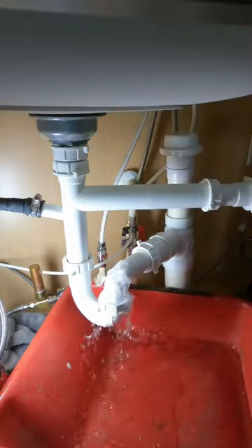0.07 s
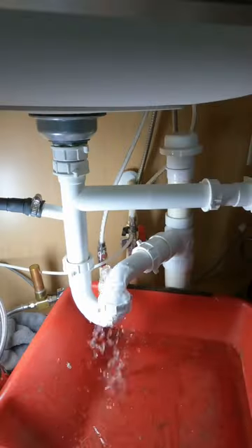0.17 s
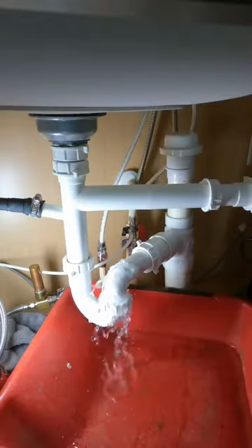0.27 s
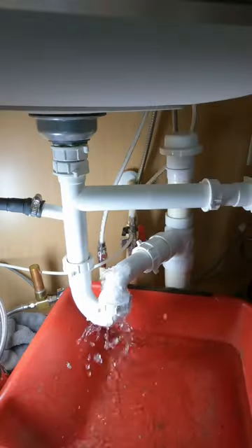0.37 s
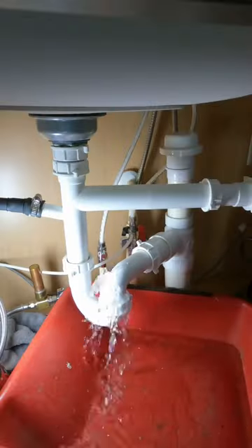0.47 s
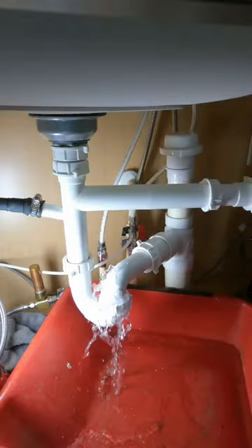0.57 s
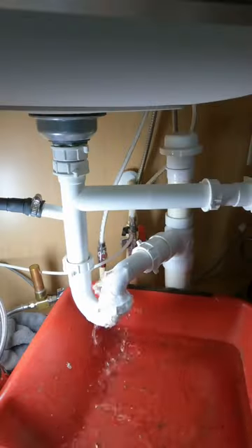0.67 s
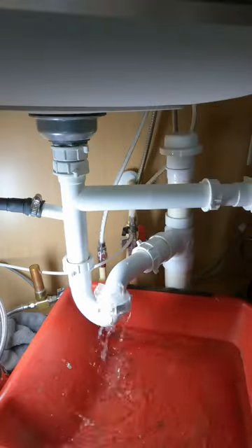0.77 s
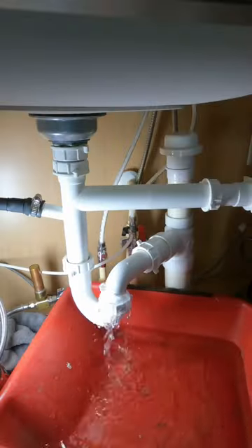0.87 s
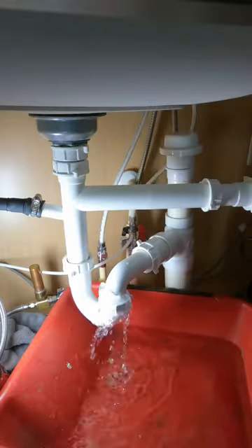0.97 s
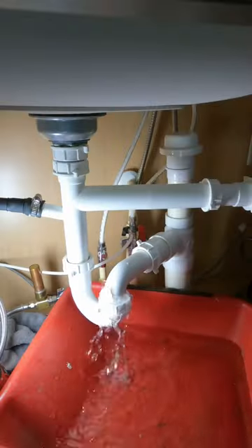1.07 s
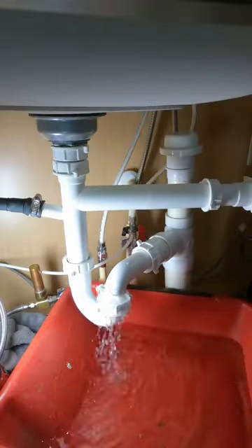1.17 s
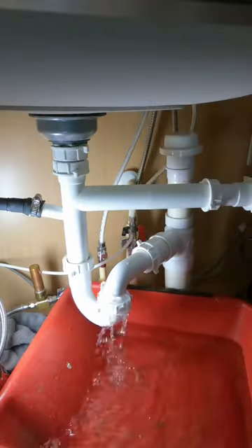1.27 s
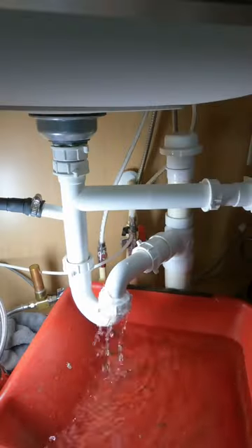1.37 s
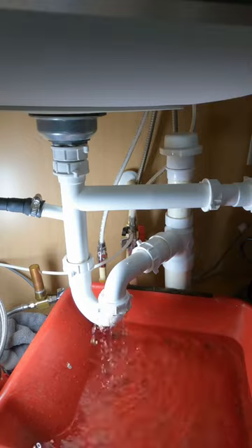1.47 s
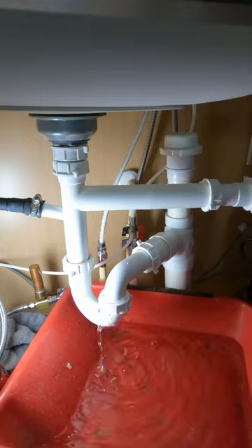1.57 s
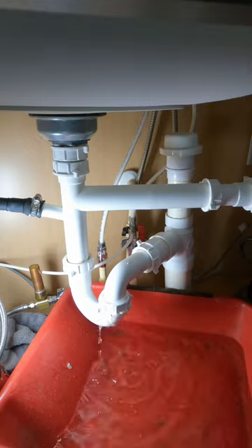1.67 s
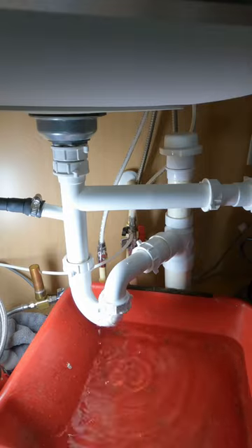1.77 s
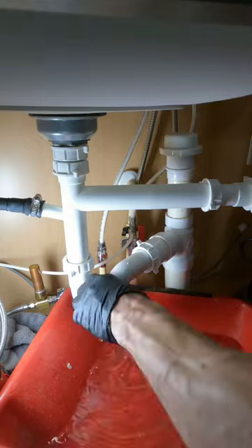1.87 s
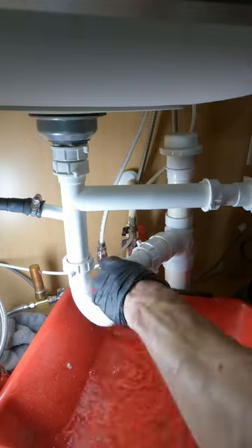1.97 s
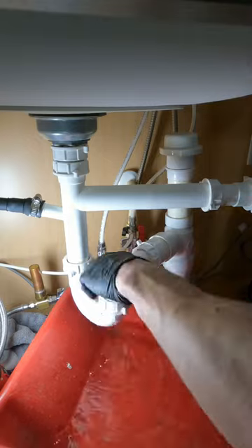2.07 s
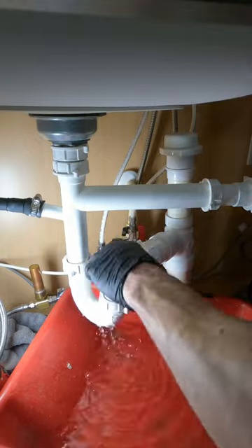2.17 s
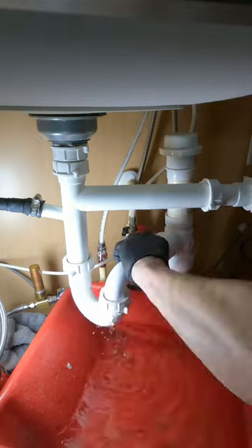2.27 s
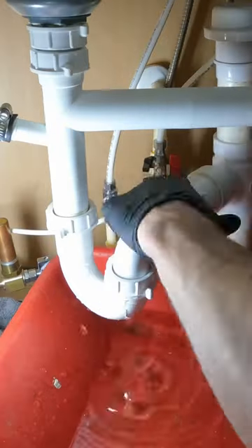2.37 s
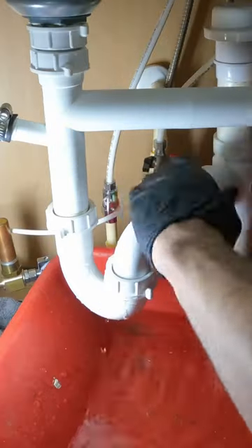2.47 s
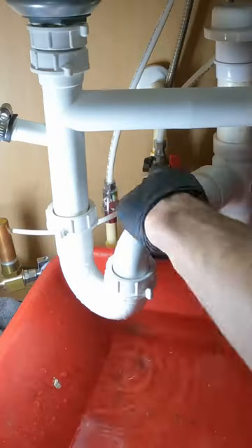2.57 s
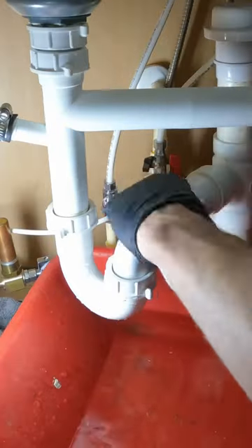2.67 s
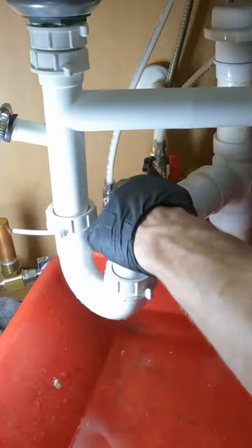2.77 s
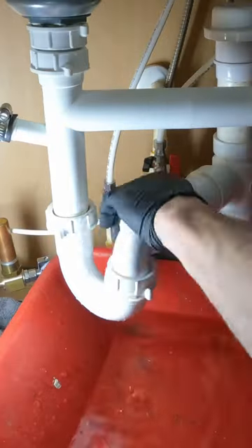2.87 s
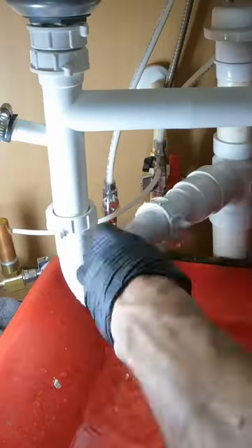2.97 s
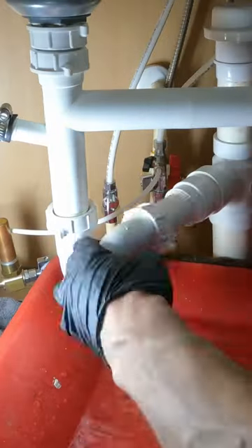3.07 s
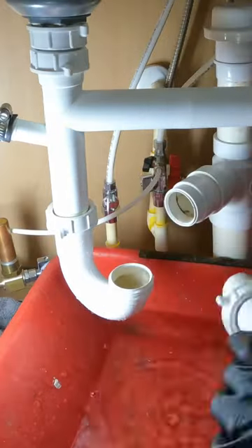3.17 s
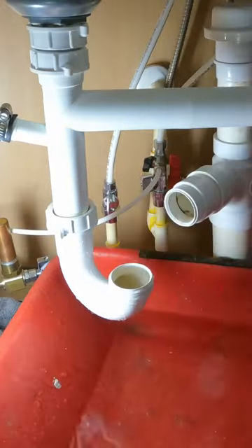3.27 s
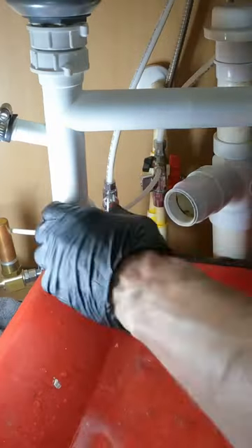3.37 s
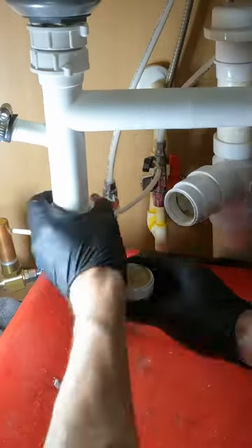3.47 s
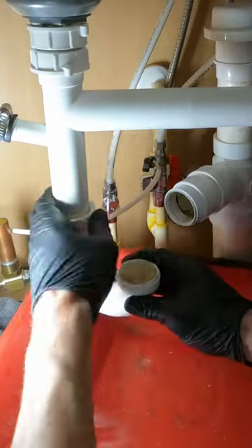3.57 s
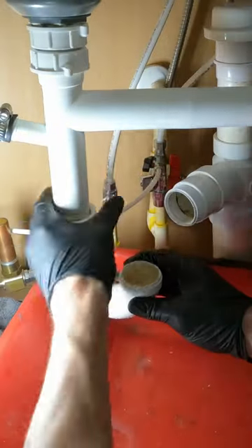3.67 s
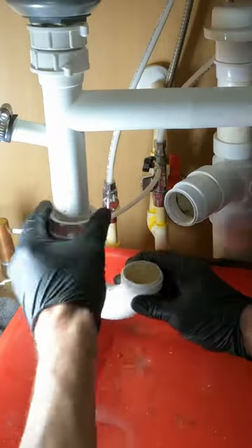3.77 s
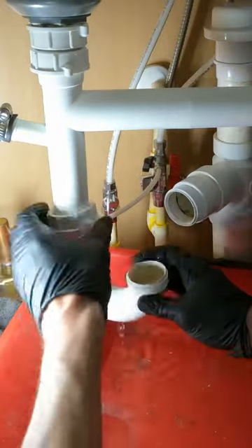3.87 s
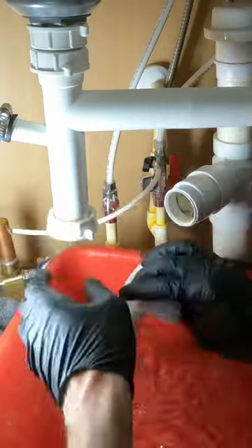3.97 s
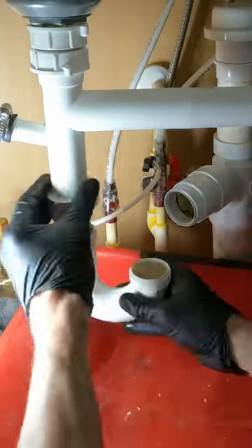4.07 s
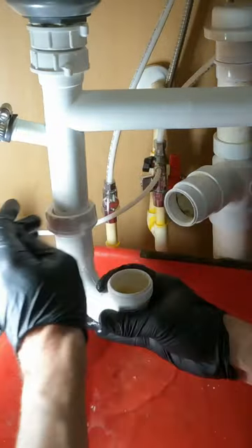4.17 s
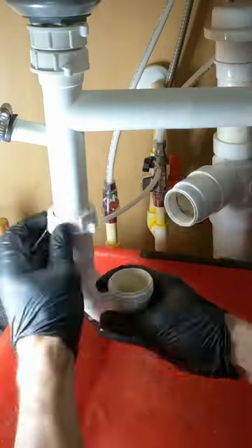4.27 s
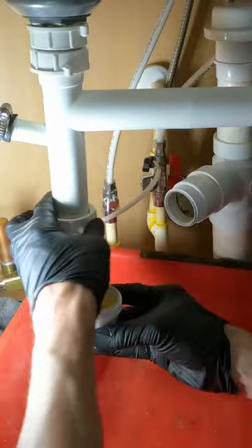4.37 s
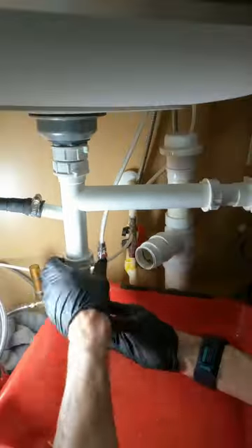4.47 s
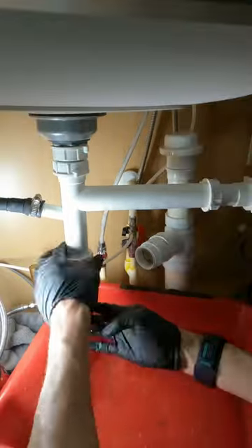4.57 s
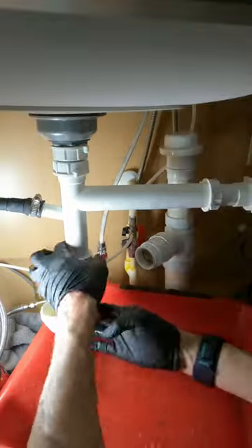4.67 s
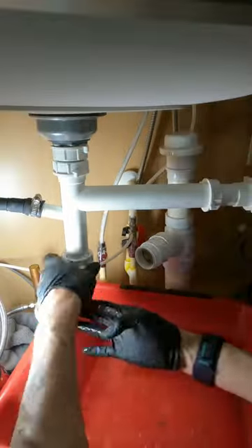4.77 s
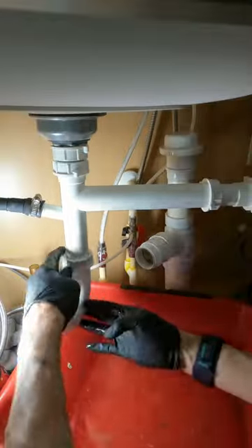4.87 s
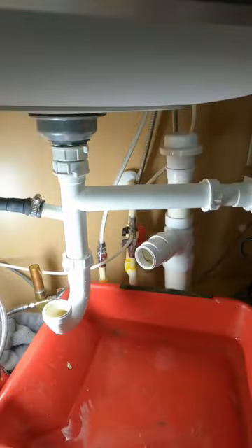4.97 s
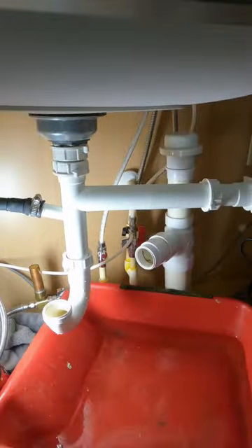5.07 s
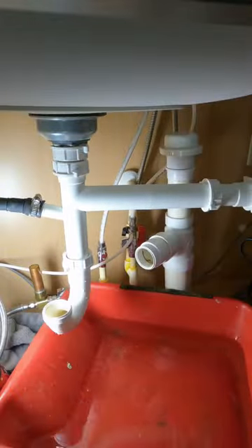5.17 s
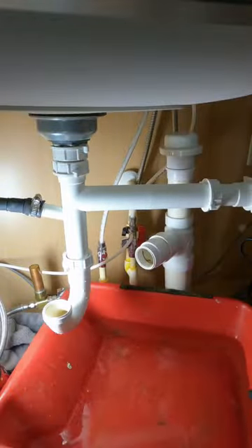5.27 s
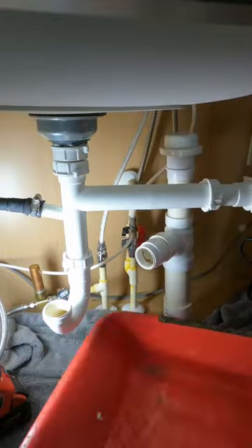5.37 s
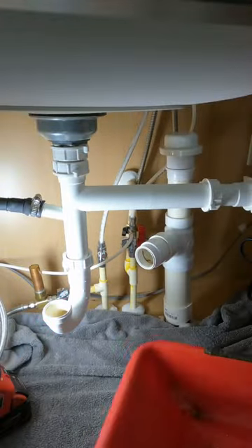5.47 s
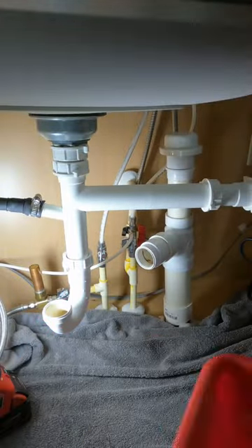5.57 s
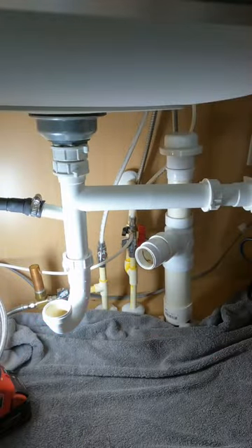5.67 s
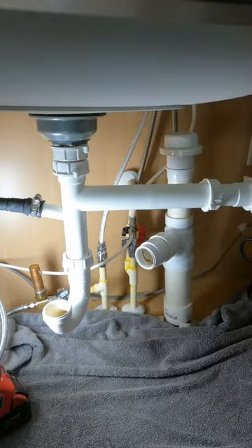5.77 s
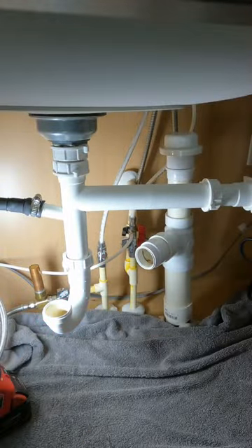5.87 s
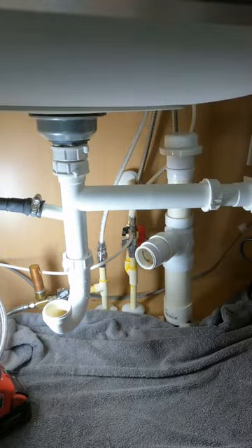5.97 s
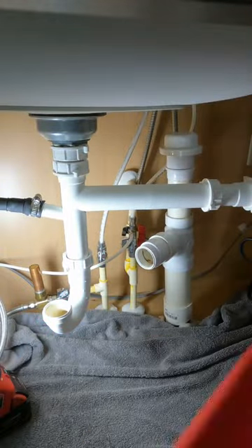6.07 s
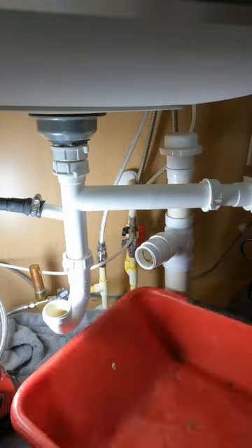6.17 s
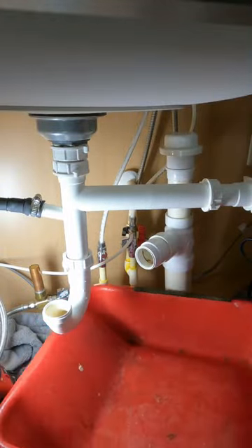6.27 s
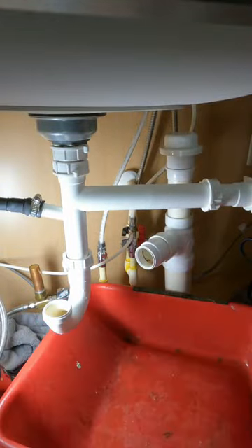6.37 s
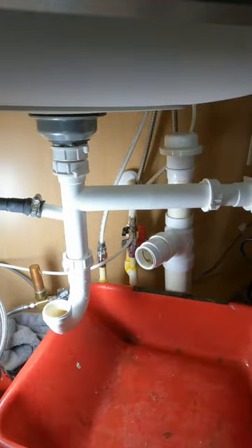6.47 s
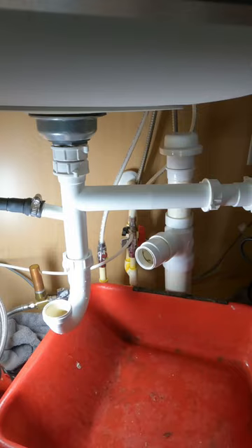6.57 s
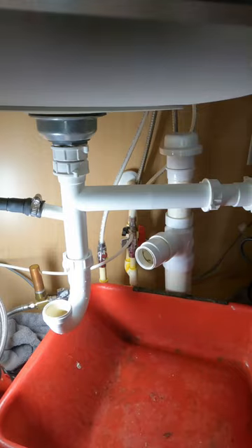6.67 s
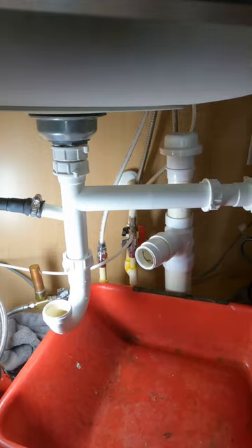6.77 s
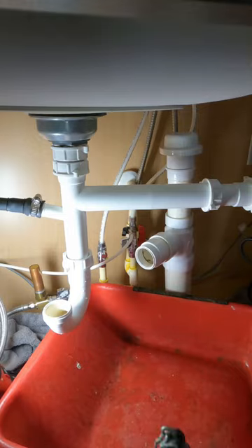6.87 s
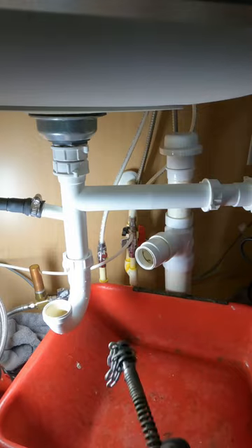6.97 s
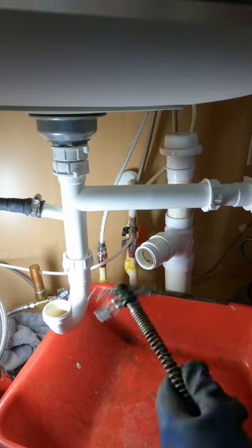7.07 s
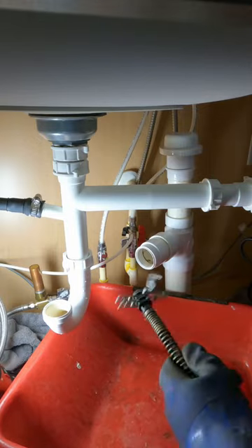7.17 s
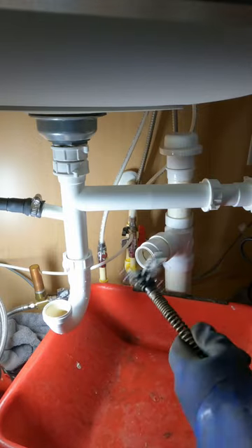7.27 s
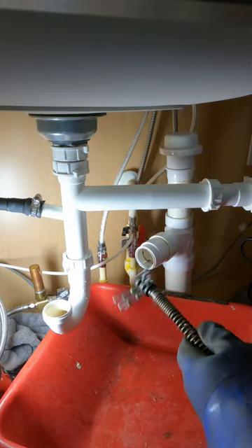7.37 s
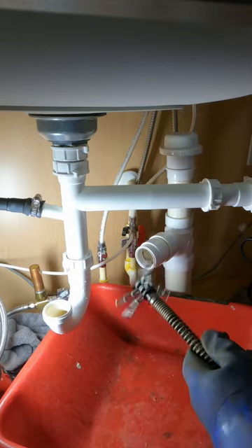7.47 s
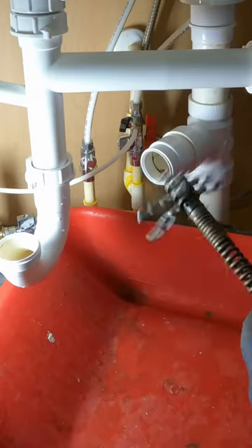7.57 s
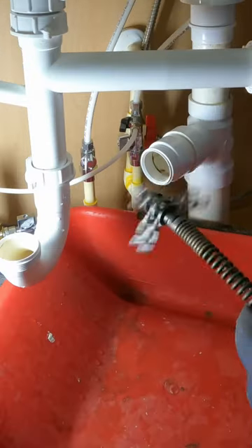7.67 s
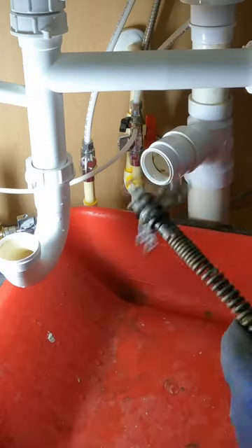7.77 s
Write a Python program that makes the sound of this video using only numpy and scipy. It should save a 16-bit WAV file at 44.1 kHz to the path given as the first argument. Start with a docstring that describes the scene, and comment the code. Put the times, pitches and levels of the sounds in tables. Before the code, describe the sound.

Close under a kitchen sink, water gushes and slaps into a plastic tub, thins to a fluttering hissing spray and spits out. Gloved hands twist plastic nuts in clicks and gritty scrapes, with one loud hollow pop as the pipe comes free. The tub is knocked and dragged about, cloth swishes softly, then an electric drain machine starts suddenly with a chattering steel head and a steady gear whine.

```python
"""Under a kitchen sink: water gushes from a loosened plastic trap into a tub, thins to a spray and sputters out.
The water is grain noise, ringing slugs, bubbles and trap resonances; the spray slides a comb over its hiss.
Gloved hands unscrew the nuts in clicks and scrapes, pull the pipe off and shift the tub: grit rings plastic modes.
Then an electric drain machine starts: a gear whine from sine lines, and a steel cable rattling in grain noise
as its head swings round. Quiet room noise lies under it all."""
import sys
import numpy as np
from scipy import signal
from scipy.fft import rfft, irfft
from scipy.io import wavfile
from scipy.ndimage import uniform_filter1d

SR = 44100
rng = np.random.default_rng(int(sys.argv[2]) if len(sys.argv) > 2 else 0)


def store_pcm(level_fs):
    """Save levels as 16-bit WAV."""
    pcm = np.round(np.clip(level_fs, -1, 1) * 32767).astype(np.int16)
    wavfile.write(sys.argv[1], SR, np.atleast_2d(pcm).T)


N = 344421
T_S = np.arange(N) / SR
HIT_S = T_S[:SR // 6]  # time axis of one hit

# gush spectrum: freq_hz, gain_db
GUSH_COLOUR = [(59, -58), (100, -39), (156, -39), (302, -8.5), (380, -16), (558, -1.5), (721, -21.5),
               (880, -18.5), (1060, -7.5), (1190, -15.5), (1650, -12), (1900, -15), (2170, -8.5),
               (2450, -29), (3780, -19), (4800, -23), (5500, -30), (7200, -33), (16000, -28.5)]
# slugs of water slapping the tub floor: start_s, ring_hz (10 ms in), level_db
SLAPS = [(.024, 571, -37.5), (.08, 547, -36), (.14, 557, -31.5), (.185, 550, -29.5), (0.204, 462, -44),
         (.25, 571, -31.5), (.3, 535, -35), (.335, 591, -31.5), (.372, 557, -29.5), (0.419, 443, -39.5),
         (0.456, 547, -30.5), (.493, 610, -38), (0.519, 579, -30), (.578, 548, -39), (.615, 536, -27.5)]
SLAP_GLIDE_PER_S = 3.6  # trapped air rises by this share of ring_hz a second
GUSH_END_S, GUSH_DB = .668, -48  # level between slugs, before lulls
# falters of the gush: centre_s, gain_db
LULLS = [(.066, -3), (.232, -5), (.567, -8.5)]
LULL_HALF_S = .012
GURGLE_HZ, GURGLE_WANDER, GURGLE_DB = 2147, .03, -9.5  # water-filled bend; wander as share, level against patter
# drops bursting in the tub and on wet plastic: start_s, bubble_hz, level_db
SPLASHES = [(.009, 4970, -43.5), (0.03, 12500, -46), (0.049, 11300, -42), (.08, 10100, -50.5),
            (.106, 13400, -50), (.19, 8790, -50), (0.208, 4260, -47), (.271, 9000, -48.5),
            (0.334, 4850, -48), (.341, 7500, -51), (0.353, 14300, -47), (0.377, 5900, -49.5),
            (.42, 14700, -46), (.523, 3970, -51), (.538, 11500, -48), (2.16, 9800, -41.5),
            (2.215, 8550, -48), (2.23, 14300, -53), (2.273, 7600, -50.5), (2.285, 14300, -45),
            (3.159, 9300, -54), (3.197, 9700, -50), (3.229, 9400, -52.5), (3.246, 9400, -54.5),
            (3.258, 12400, -58), (3.296, 9600, -57), (3.323, 8900, -43), (3.338, 9200, -52),
            (3.967, 8000, -46), (4.332, 7800, -52), (4.405, 7900, -51), (5.21, 6500, -55),
            (5.221, 6500, -56)]
CRACKLE_START_DB, CRACKLE_SAG_DB_PER_S = -57, 24  # fine droplets

# spray spectrum: freq_hz, gain_db
SPRAY_COLOUR = [(200, -35), (360, -11.5), (700, -32), (1000, -11), (1450, -6.5), (2900, -0.5), (4000, -5.5),
                (4800, -3.5), (5400, 2.5), (8000, -1), (11000, 0.5), (11800, -12), (14000, -5),
                (16000, -11)]
SPRAY_END_S, SPRAY_START_DB, SPRAY_SAG_DB_PER_S = 1.49, -50, 4.5
GAP_START_HZ, GAP_SAG_HZ_PER_S, GAP_LOWEST_HZ = 2610, 1060, 1835  # resonance of the gap in the joint
# surges of the jet: centre_s, gain_db
SURGES = [(.685, 1.5), (.77, 2.5), (.915, 3), (1.066, 11.5), (1.29, 4.5), (1.395, 1.5), (1.47, 2.5)]
SURGE_HALF_S, SURGE_HISS_SHARE = 0.03, 0.38  # share of the surge dB that reaches the hiss
# last dribbles of the joint: start_s, end_s, level_db
DRIBBLES = [(1.49, 1.575, -57.5), (1.58, 1.655, -51), (1.67, 1.79, -62)]
# last spits of the joint: start_s, level_db
SPITS = [(1.582, -53), (1.6, -51), (1.611, -64), (1.6253, -45.5), (1.638, -50), (1.644, -46.5), (1.68, -52),
         (1.712, -50), (1.721, -50), (1.735, -47.5), (1.773, -51.5), (1.781, -54)]
# resonances of a spit: freq_hz, width_hz, gain_db
SPIT_MODES = [(3050, 430, 2), (5670, 290, -5), (6600, 170, 5), (7660, 210, 9), (8600, 380, 14),
              (14300, 2000, -18)]
BEND_LOW_HZ, BEND_DB = 1470, -8  # trap ring, level against the jet strength
# upper resonance of the draining trap: time_s, freq_hz, gain_db
BEND_UPPER = [(.67, 2665, 13), (.8, 2357, 1.5), (.92, 2240, 4), (1.09, 2206, -6), (1.11, 3055, -1.5),
              (1.5, 2880, 4)]
# pipe popping out of its wet socket, rising in pitch
POP_S, POP_START_HZ, POP_RISE_HZ_PER_S, POP_T60_S, POP_DB = 3.325, 1060, 72000, .014, -12.5
POP_UPPER_HZ = 1930  # second, shorter ring

# drain machine: the loose head chatters first, then the cable spins freely
MOTOR_ON_S, CHATTER_END_S = 6.665, 7.055
WHINE_HZ, CHATTER_SHARP_HZ = 1418.3, 8  # the whine runs this much higher during the chatter
WHINE_DB, CHATTER_DUCK_DB, CABLE_DB, CHATTER_DB = -35.5, -3.5, -35.5, -28.5
CHATTER_SAG_DB = 2.5  # chatter at its start and end, against half way
START_KICK_DB, START_KICK_S = 7, 0.12  # louder whine while the motor takes up the cable
# gearbox lines: multiple of the whine, level_db
GEAR_LINES = [(0.8127, -18.5), (1, 2), (1.0625, -15), (1.253, -12), (1.375, -26), (1.685, -18.5), (2, -9.5),
              (2.127, -23), (2.626, -22), (2.752, -29), (3, -11.5), (4, -14.5), (4.067, -21), (4.462, -39),
              (4.858, -29), (5, -18), (6.18, -23), (10.335, -28)]
# spinning cable spectrum: freq_hz, gain_db
CABLE_COLOUR = [(60, -20), (120, -27), (200, -14), (280, -11), (550, -10), (850, -1), (1400, 5),
                (2000, 0.5), (2600, 1), (3400, -1), (4200, -2), (4800, -7), (5700, 2), (7300, 1),
                (8700, -2.5), (9500, -15), (12500, -12.5), (15000, -3)]
# chattering head spectrum: freq_hz, gain_db
CHATTER_COLOUR = [(100, -23), (230, -8), (480, -14), (750, -2), (1320, -1), (1470, 6), (1750, -3),
                  (2400, -2.5), (3200, .5), (4200, -3.5), (5100, 5), (6000, -4.5), (7000, 6), (8300, -7),
                  (12300, -12), (14800, 2.5)]
SWING_HZ, SWING_AT_S, SWING_DB, SWING_DRAG_HZ = 23.47, 8.198, 2.2, 2.4
RASP_START_S, RASP_DB = 6.95, -36

# pipe resonances: freq_hz, width_hz, gain_db
PIPE_MODES = [(592, 46, 2), (790, 65, 9.5), (1097, 155, 7), (1500, 220, 5.5), (2360, 140, 5.5),
              (2564, 170, 2), (2774, 89, -1), (3310, 310, 1.5), (3800, 1100, -10), (5370, 170, -7),
              (6780, 250, 6.5), (7960, 180, -16), (12700, 660, -17)]
# clicks of nuts and pipe; a snap rises at once, a grating slip slowly:
# start_s, ring_hz, rise_s, body_db, edge_db, tick_db
CLICKS = [(1.7559, 1900, 0.0012, -44, -48.5, -67), (1.8912, 747, 0.00043, -39.5, -69, -78),
          (1.9048, 794, 0.0017, -40, -48.5, -51.5), (1.934, 775, .002, -43, -61, -74),
          (1.9486, 1215, 0.002, -41, -45, -47.5), (1.9764, 1160, 0.0025, -39, -62, -80),
          (1.9932, 737, 0.0018, -39, -48, -62), (2.0208, 750, .0004, -35, -50, -61),
          (2.043, 800, 0.0021, -44, -52, -61), (2.0768, 1626, 0.00084, -37, -48, -46),
          (2.107, 1105, .001, -52, -54, -52), (2.1226, 1730, 0.0018, -42, -46, -43.5),
          (2.1485, 1700, 0.0018, -36, -42.5, -39), (2.2085, 1670, 0.00077, -50.5, -56, -52),
          (2.3449, 1133, .002, -35.5, -47, -51.5), (2.3693, 1060, 0.0019, -50, -44, -55),
          (2.399, 1110, 0.0027, -52, -49, -55), (2.416, 1083, 0.00067, -43, -47, -58),
          (2.463, 1080, .003, -52, -55, -60), (2.4975, 1130, 0.0011, -47, -54, -70),
          (2.526, 1120, 0.0021, -49.5, -54, -67), (2.54, 1075, 0.0016, -52.5, -59, -61),
          (2.6004, 1130, 0.0019, -46.5, -49, -61), (2.635, 1750, .001, -49.5, -48.5, -54),
          (2.6528, 1150, 0.0026, -52, -53, -61), (2.6779, 1527, 0.0019, -40, -44, -49),
          (2.691, 1150, .001, -50, -50, -61), (2.7466, 1100, 0.0013, -49.5, -44, -54.5),
          (2.763, 1100, .0008, -69, -47, -57), (2.7802, 1150, 0.0018, -40.5, -43, -50.5),
          (2.8213, 1080, 0.0032, -38, -37.5, -44), (2.8421, 1082, .002, -31, -36, -38),
          (2.8665, 1147, 0.00029, -33.5, -37.5, -50), (2.893, 1174, 0.0018, -30.5, -36.5, -41.5),
          (2.9061, 1166, 0.00082, -38, -43, -49), (2.9292, 1130, 0.00089, -42, -51, -66),
          (2.9395, 1096, .0006, -39, -37, -45.5), (2.9459, 1124, 0.0032, -34.5, -39.5, -42),
          (2.9655, 1130, 0.00085, -44, -50, -56), (2.9724, 1110, 0.0019, -39, -52, -64),
          (2.996, 1180, 0.00056, -40, -46, -54), (3.0029, 1070, 0.0017, -38, -43, -50),
          (3.016, 1100, 0.0035, -51, -48, -50), (3.0278, 1123, 0.0017, -32, -39.5, -50),
          (3.0407, 1360, 0.00043, -39, -44, -64), (3.0569, 1160, 0.0028, -34, -42.5, -50.5),
          (3.0917, 1160, 0.0025, -36.5, -47, -51), (3.1164, 1147, .0004, -30.5, -38, -45.5),
          (3.1339, 1200, 0.00031, -34.5, -36, -43.5), (3.5455, 1146, 0.0013, -40.5, -56, -69),
          (3.5875, 1060, 0.0023, -48, -45.5, -61), (3.5955, 1100, 0.0024, -48, -48, -66),
          (3.629, 1150, 0.0025, -41.5, -41.5, -64), (3.636, 1135, .001, -52, -47, -66),
          (3.674, 1080, 0.0016, -56, -47, -68), (3.689, 1140, 0.0022, -45, -51, -63),
          (3.7106, 1060, 0.00043, -39.5, -36, -54), (3.7466, 1130, 0.00089, -44, -47, -70),
          (3.786, 1120, .001, -43, -50, -58), (3.8001, 1160, .0002, -41.5, -36.5, -54),
          (3.8175, 790, 0.00022, -44.5, -40.5, -55), (3.8336, 1085, .001, -40.5, -57, -72),
          (3.86, 1074, 0.0008, -43, -51, -70), (3.8772, 790, .0003, -47, -41, -49),
          (3.8809, 1093, 0.0012, -39, -34.5, -52), (3.893, 1093, 0.0033, -46, -44, -59),
          (3.9046, 1680, 0.0013, -68, -47, -47.5), (3.913, 1500, 0.0017, -64, -49, -54),
          (3.9545, 1220, 0.0022, -43.5, -48, -49.5), (4.0024, 1150, 0.001, -45, -39, -42),
          (4.0193, 1093, 0.0022, -38.5, -40.5, -53), (4.034, 1100, 0.00095, -50, -44, -62),
          (4.0437, 1060, 0.00087, -45.5, -38, -61), (4.0738, 1097, .0003, -51, -39, -65),
          (4.0815, 1500, .001, -63, -39.5, -50.5), (4.0998, 1150, 0.0004, -43.5, -48, -68),
          (4.1366, 1060, 0.0026, -48.5, -44.5, -44), (4.171, 1180, 0.0026, -49, -44.5, -45),
          (4.186, 1220, 0.00065, -62, -38.5, -41), (4.2074, 1157, .0002, -45.5, -43.5, -47),
          (4.2195, 1100, 0.00033, -64, -55, -50), (4.228, 1150, 0.00091, -62, -55, -52),
          (4.2458, 1130, .0003, -50, -48.5, -60), (4.2643, 1070, .0002, -62, -49, -46.5),
          (4.2953, 1140, 0.0018, -47, -53, -70), (4.306, 790, 0.0012, -50, -56, -71),
          (4.3227, 1130, 0.0019, -44.5, -49.5, -49.5), (4.354, 1025, 0.0027, -42, -52, -54),
          (4.395, 1120, 0.0033, -48, -53, -47), (4.429, 707, 0.00085, -47, -53, -54),
          (4.449, 726, 0.0031, -40, -43, -52), (4.464, 700, .002, -47, -53, -60),
          (4.5831, 1666, 0.00036, -43.5, -66, -49.5), (4.645, 800, .002, -56, -61, -60),
          (4.609, 816, 0.0035, -50.5, -58, -57), (4.6855, 694, 0.00052, -46, -43.5, -43),
          (4.7081, 717, 0.00083, -45.5, -46, -47.5)]
PIPE_RING_HZ, PIPE_T60_S = 1082, 0.022
# thud against body, more for parts that ring lower; air against tick
PIPE_THUD_DB, THUD_DB_PER_OCTAVE, PIPE_AIR_DB = -22.5, 31.5, -3.5
# twists of nuts and pipe, threads rubbing: start_s, end_s, level_db
TWISTS = [(1.847, 2.142, -52), (2.324, 2.797, -60.5), (2.84, 3.133, -53), (3.456, 3.569, -54.5),
          (3.578, 3.897, -49.5), (4.006, 4.388, -60.5), (4.397, 4.471, -48.5), (4.535, 4.653, -58)]
# random faint slips in a twist; level against the rubbing, edge and tick against the body
SLIPS_PER_S, SLIP_DB, SLIP_SPREAD_DB, SLIP_RISE_S = 17, -3, 4, 0.00199
SLIP_EDGE_DB, SLIP_TICK_DB = -8, -10
# tub resonances: freq_hz, width_hz, gain_db
TUB_MODES = [(650, 24, -21), (900, 55, -21), (1266, 51, 2.5), (1400, 95, -15), (1670, 46, -1.5),
             (2200, 670, -5.5), (2820, 280, -12.5), (3314, 120, -5.5), (4460, 98, -19), (6500, 1060, -4)]
# knocks of the tub, lifted and set down: start_s, ring_hz, t60_s, level_db, thud_db, hardness_db
KNOCKS = [(4.764, 505, 0.035, -54.5, -62, -3.5), (4.8993, 1444, 0.04, -40, -39.5, 2.5),
          (5.1918, 790, 0.013, -24.5, -56, -5.5), (5.255, 650, 0.028, -54.5, -59, -3),
          (5.274, 615, .02, -55, -49, -23), (5.298, 773, 0.061, -45, -55, -9),
          (5.394, 764, 0.072, -41, -48, -21), (5.44, 650, 0.014, -38.5, -41.5, 3.5),
          (5.469, 1770, .015, -46, -54, -5), (5.477, 1726, 0.0096, -39, -50, -3),
          (5.502, 1860, 0.017, -48.5, -47, 5), (5.509, 1663, 0.011, -44.5, -41.5, 4),
          (5.6565, 703, 0.011, -58, -51.5, 10.5), (5.784, 625, 0.065, -32, -38, -9),
          (5.791, 1573, 0.23, -32.5, -52, -7), (5.839, 1685, 0.031, -38.5, -61, 9.5),
          (5.855, 1416, 0.17, -29.5, -32, -6.5), (5.8725, 1123, 0.0087, -29, -37, -18),
          (5.96, 1214, 0.16, -44.5, -75, 2), (5.988, 1400, .04, -48, -70, 1.5),
          (6.009, 1470, 0.11, -42.5, -71, -1.5), (6.031, 1300, 0.037, -52, -71, -2.5),
          (6.072, 1290, 0.019, -62.5, -63, 0.5), (6.172, 1100, 0.056, -57.5, -78, -3.5),
          (6.39, 1330, 0.069, -60, -66, -19)]
# edge, tick and air of a knock: offset_db against its level, share of the hardness
TUB_BRIGHTNESS = [(-0.5, 0.93), (-8.5, 1.6), (-18, 1.7)]
KNOCK_RISE_S, KNOCK_RISE_DB_PER_DB = 0.00055, .2  # rise at zero hardness; a harder knock rises faster
# edges of the thud, body, edge, tick and air bands: freq_hz
HIT_EDGES_HZ = [135, 600, 1700, 4200, 10000, 16500]
DETUNE, SPOT_SPREAD_DB = .012, 2.5  # scatter of each struck mode; detune as share of its pitch
LONGEST_RING_S = .045  # cap on the t60 of the leading mode
SNAP_SHARE = 0.44  # t60 of the treble as share of the contact's
FIRST_SLIP_GAIN, FIRST_SLIP_S = 0.86, 0.00058  # spike at the front, smaller for a slow rise

# rubbing thread spectrum: freq_hz, gain_db
THREAD_COLOUR = [(85, -23), (160, -8), (250, -17.5), (350, -6.5), (460, -12), (610, 3), (700, -2.5),
                 (790, 4.5), (900, -5), (1130, -6), (1350, -10), (1500, -1.5), (1900, -8), (2330, -4),
                 (2700, -11.5), (2950, -17), (3290, -15.5), (4200, -16), (8000, -72)]
# fine scraping of wet threads: start_s, end_s, level_db
SCRAPES = [(2.33, 2.8, -62), (2.81, 3.1, -54), (3.58, 3.91, -65)]
# scrape spectrum: freq_hz, gain_db
SCRAPE_COLOUR = [(1000, -14), (1600, 6), (2400, 1.5), (2900, -1), (3350, 3), (4200, -10), (6400, -14),
                 (9000, -26), (15000, -27)]
# gloves crinkling: start_s, end_s, level_db
CRINKLES = [(2.29, 2.8, -63), (2.82, 3.13, -61), (3.58, 3.92, -69), (4.01, 4.17, -78), (4.18, 4.65, -60.5),
            (5.82, 5.88, -51), (5.93, 5.99, -55), (6.21, 6.33, -74)]
# crinkle spectrum: freq_hz, gain_db
RUSTLE_COLOUR = [(900, -3), (1500, 9.5), (2200, 4.5), (4000, 1), (6500, -5), (11000, -11), (15000, -4)]
# shoves of the tub: start_s, end_s, level_db
SHOVES = [(5.315, 5.355, -52.5), (5.368, 5.41, -47.5)]
# soft bumps on the cabinet floor: start_s, pitch_hz, level_db
BUMPS = [(4.409, 96, -59), (5.161, 297, -52), (5.469, 191, -48), (5.505, 254, -49), (5.788, 82, -49.5),
         (5.854, 231, -35), (6.241, 100, -59), (6.32, 102, -62.5), (6.387, 245, -51), (6.56, 80, -65),
         (7.079, 112, -46), (7.192, 61, -45)]
# sleeve and towel swishing past: start_s, end_s, centre_hz, level_db
SWISHES = [(3.365, 3.434, 5900, -54), (3.5, 3.57, 7560, -58.5), (4.425, 4.505, 10600, -59.5),
           (5.038, 5.165, 3330, -59.5), (5.13, 5.196, 5630, -53), (5.27, 5.438, 2950, -59.5),
           (5.32, 5.525, 6240, -58), (5.548, 5.585, 4500, -56), (5.613, 5.672, 4500, -53),
           (5.688, 5.735, 3520, -56.5), (5.905, 6.022, 3800, -55.5), (6.06, 6.089, 7000, -67),
           (6.217, 6.29, 6200, -68.5), (6.342, 6.371, 6000, -59.5), (6.483, 6.667, 10100, -68.5)]
# room noise spectrum: freq_hz, gain_db
ROOM_COLOUR = [(60, -6), (120, -7.5), (250, -6.5), (500, -8), (700, -9), (1000, -7.5), (2500, -12),
               (4000, -15.5), (8000, -17), (16000, -14.5)]
# narrow background hush: start_s, end_s, low_hz, high_hz, level_db
HUSH = [(1.6, 6.04, 1360, 2520, -66.5), (6, 6.7, 830, 1660, -64.5)]
ROOM_DB, TOP_HZ = -71, 15900


def gush():
    """Drops patter into the tub, slugs of water ring its floor, tiny bubbles fizz on top."""
    out, slugs = np.zeros(N), np.zeros(N)
    swell = HIT_S / 0.014 * np.exp(1 - HIT_S / 0.0072)
    for s, hz, level_db in SLAPS:
        add(slugs, s, amp(level_db) * swell)
        cycles = hz * HIT_S * (1 + SLAP_GLIDE_PER_S * (HIT_S / 2 - .01))
        add(out, s, amp(level_db - 1) * swell * np.sin(2 * np.pi * cycles))
    steady = strokes([(0, GUSH_END_S, GUSH_DB)], attack_s=0.0022, release_s=0.0026)
    flow = (steady + 0.16 * slugs) * amp(2.0 * walk(68.94))
    gurgle_hz = GURGLE_HZ * (1 + GURGLE_WANDER * walk(14))
    gurgle = walk(170) * np.sin(2 * np.pi * np.cumsum(gurgle_hz) / SR + walk(150))
    patter = colour(grains(2500, 2.2), GUSH_COLOUR)
    out += (patter + amp(GURGLE_DB) * unit(gurgle)) * flow
    for when, pitch, size in rng.random((130, 3)):
        hz = 3500 + 12000 * np.sqrt(pitch)
        bubble = fade(24 / hz) * np.sin(2 * np.pi * hz * HIT_S)
        add(out, GUSH_END_S * when ** 1.7, amp(-46.0 + 15.4 * size ** 4) * bubble)
    return out


def splashes():
    """Each big drop cracks and leaves a tiny ringing bubble; fine droplets crackle between them."""
    out = np.zeros(N)
    for s, hz, db in SPLASHES:
        crack = band(rng.standard_normal(len(HIT_S)) * fade(0.027), 1600, 21500)
        bubble = np.sin(2 * np.pi * hz * HIT_S) * fade(0.0071)
        add(out, s, burst(unit(crack) + 1.16 * unit(bubble), db))
    droplets = unit(band(grains(900, 3.2) * amp(3 * walk(120)), 3500, 16000))
    level = strokes([(0, GUSH_END_S, CRACKLE_START_DB)], attack_s=0.0016, release_s=.003)
    return out + droplets * level * amp(-CRACKLE_SAG_DB_PER_S * T_S)


def pouring():
    """Gain of the gush as it falters."""
    return amp(sum(db * np.exp(-((T_S - s) / LULL_HALF_S) ** 2) for s, db in LULLS))


def spray():
    """A fluttering jet hisses through the narrow joint, then breaks into spits."""
    strength, surge_db = jet()
    gap_hz = np.clip(GAP_START_HZ - GAP_SAG_HZ_PER_S * (T_S - GUSH_END_S), GAP_LOWEST_HZ, GAP_START_HZ)
    flutter = np.sin(2 * np.pi * np.cumsum(95 * (1 + 0.232 * walk(77))) / SR)
    hiss = grains(14000, 2.2) * amp(3.6 * flutter + 1.6 * walk(250))
    # the echo inside the gap makes a comb that slides as the flow drops
    hiss = hiss + .5 * np.interp(T_S - 1 / gap_hz, T_S, hiss)
    level = strength * amp(SURGE_HISS_SHARE * surge_db)
    level = level + strokes(DRIBBLES, attack_s=0.011, release_s=0.013)
    out = colour(hiss, SPRAY_COLOUR) * level
    for s, spit_db in SPITS:
        puff = rng.standard_normal(len(HIT_S)) * fade(0.0041)
        spit = signal.fftconvolve(puff, ring(SPIT_MODES))[:len(HIT_S)]
        add(out, s, burst(band(spit, 1500, 16000), spit_db))
    return out


def jet():
    """Strength of the steadily weakening jet (gain) and its surges (dB)."""
    strength = strokes([(GUSH_END_S, SPRAY_END_S, SPRAY_START_DB)], attack_s=0.0041, release_s=0.0025)
    strength = strength * amp(-SPRAY_SAG_DB_PER_S * (T_S - GUSH_END_S))
    return strength, sum(db * np.exp(-((T_S - s) / SURGE_HALF_S) ** 2) for s, db in SURGES)


def bend():
    """Flutter of the jet rings two resonances of the wet trap; the upper one moves as it drains."""
    strength, surge_db = jet()
    upper_hz, upper_db = curves(BEND_UPPER)
    low = walk(480) * np.sin(2 * np.pi * BEND_LOW_HZ * T_S + walk(450))
    upper = amp(upper_db) * walk(420) * np.sin(2 * np.pi * np.cumsum(upper_hz) / SR + walk(350))
    return (low + upper) * strength * amp(BEND_DB + surge_db + 2 * walk(150))


def pop():
    """The seal lets go with a tick, and the air in the pipe rings for a few cycles."""
    out = np.zeros(N)
    cycles = POP_START_HZ * HIT_S + POP_RISE_HZ_PER_S * HIT_S ** 2 / 2
    air = fade(POP_T60_S) * np.sin(2 * np.pi * cycles)
    air = air + 0.35 * fade(0.0088) * np.sin(2 * np.pi * POP_UPPER_HZ * HIT_S)
    add(out, POP_S, amp(POP_DB) * band(np.minimum(HIT_S / .001, 1) * air, 620, 5000))
    tick = band(rng.standard_normal(len(HIT_S)) * fade(0.024), 8800, 16500)
    add(out, POP_S - .002, burst(tick, -44))
    return out


def machine():
    """Gears whine and the steel coil rattles, both swelling with each swing of the cable."""
    chatter = strokes([(MOTOR_ON_S, CHATTER_END_S, 0)], attack_s=0.0018, release_s=0.0082)
    progress = (T_S - MOTOR_ON_S) / (CHATTER_END_S - MOTOR_ON_S)
    chatter_db = CHATTER_DB + CHATTER_SAG_DB * np.cos(2 * np.pi * progress) / 2
    whine_hz = WHINE_HZ + CHATTER_SHARP_HZ * chatter
    whine_db = WHINE_DB + CHATTER_DUCK_DB * chatter
    whine_db = whine_db + START_KICK_DB * np.exp(-np.abs(T_S - MOTOR_ON_S) / START_KICK_S)
    swing = np.cos(2 * np.pi * SWING_HZ * (T_S - SWING_AT_S))
    # each swing loads the gears: louder and a little slower
    jitter = 0.000366 * walk(40) + 0.0021 * chatter * walk(60)
    mesh = 2 * np.pi * np.cumsum(whine_hz * (1 + jitter) - SWING_DRAG_HZ * swing) / SR
    # while the head chatters, its load is irregular and hides the swing
    loose = 0.99 * chatter
    load_db = (1 - loose) * SWING_DB * swing + loose * 2 * walk(130)
    whine = 0
    for k, db in GEAR_LINES:
        # even harmonics feel the load more; all but the main line sink while the head chatters
        upper_db = (k % 2 == 0) * 1.3 * load_db - (k != 1) * 9 * loose
        phase = k * mesh + 0.22 * walk(30) + 2 * np.pi * rng.random()
        whine = whine + amp(whine_db + db + load_db + upper_db + .5 * walk(42)) * np.sin(phase)
    # the coil rubs at the same spots on every turn, and its steel rings on
    turn = np.resize(grains(9000, 0.69)[:int(SR / SWING_HZ)], N)
    coil = cabinet(0.36 * unit(turn) + grains(6000, 1.4), t60_s=0.3, wet_db=3.0)
    coil = coil * (1 + 0.48 * np.cos(mesh / 4))
    cable = colour(coil, CABLE_COLOUR) * amp(CABLE_DB + 1.5 * swing + .4 * walk(120))
    head = colour(cabinet(grains(4000, 4.1), t60_s=0.83, wet_db=4.5), CHATTER_COLOUR)
    head = head * amp(chatter_db + 1.5 * walk(170))
    # just before it settles, the head rasps more brightly
    rasp = unit(band(grains(9000, 1.5), 6500, 15000))
    rasp = rasp * strokes([(RASP_START_S, CHATTER_END_S, RASP_DB)], attack_s=0.03, release_s=0.003)
    switch = np.clip((T_S - MOTOR_ON_S) / 0.0057, 0, 1)
    return (np.sqrt(2) * whine + cable + head * chatter + rasp) * switch


def pipe_clicks():
    """Clear clicks and faint random slips: start_s, ring_hz, t60_s, rise_s, thud/body/edge/tick/air_db."""
    rows = list(CLICKS)
    for (start, end, db), draws in zip(TWISTS, rng.random((len(TWISTS), 20, 3))):
        for when, size, pitch in draws[:int(SLIPS_PER_S * (end - start))]:
            s = start + when * (end - start)
            hz = PIPE_RING_HZ * (1 + .15 * (pitch - .5))
            body = db + SLIP_DB + SLIP_SPREAD_DB * (2 * size - 1)
            rows.append((s, hz, SLIP_RISE_S, body, body + SLIP_EDGE_DB, body + SLIP_TICK_DB))
    full = []
    for s, hz, rise_s, body, edge, tick in rows:
        octaves_low = max(np.log2(PIPE_RING_HZ / hz), 0)
        thud = body + PIPE_THUD_DB + THUD_DB_PER_OCTAVE * octaves_low
        full.append((s, hz, PIPE_T60_S, rise_s, thud, body, edge, tick, tick + PIPE_AIR_DB))
    return full


def tub_knocks():
    """Knocks in the same columns; hardness of the contact sets rise and treble."""
    rows = []
    for s, hz, t60_s, db, thud, hard in KNOCKS:
        rise_s = KNOCK_RISE_S * amp(-KNOCK_RISE_DB_PER_DB * hard)
        treble = [db + offset + share * hard for offset, share in TUB_BRIGHTNESS]
        rows.append((s, hz, t60_s, rise_s, thud, db, *treble))
    return rows


def hits(table, modes, contact, crack_db, ring_db, thud_hz, thud_t60_s):
    """The plastic grates for an instant, lets go and rings; one wall mode leads, and the treble dies first."""
    out = np.zeros(N)
    lead_in_s = .008
    since = HIT_S - lead_in_s

    def swell(rise_s, t60_s):
        """Build-up to the slip, then decay."""
        return np.exp(np.minimum(since, 0) / rise_s - np.log(1000) * np.maximum(since, 0) / t60_s)

    for s, hz, t60_s, rise_s, *levels_db in table:
        grit, dull = rng.standard_normal((2, len(HIT_S)))
        # the part catches again a few milliseconds later
        catch = 1 + 1.1 * np.exp(-((since - rng.uniform(.003, .011)) / .0009) ** 2)
        catch = catch + FIRST_SLIP_GAIN * np.exp(-(rise_s + np.abs(since)) / FIRST_SLIP_S)
        push = grit * swell(rise_s, t60_s * contact) * catch
        body = unit(signal.fftconvolve(push, ring(modes))[:len(HIT_S)]) + amp(crack_db) * unit(push)
        lead = np.sin(2 * np.pi * hz * HIT_S) * swell(rise_s, min(t60_s, LONGEST_RING_S))
        lead = amp(ring_db) * unit(lead)
        dull = dull * swell(rise_s, thud_t60_s)
        thud = unit(band(dull, thud_hz, 930)) + 1.2 * unit(dull)
        snap = grit * swell(rise_s, t60_s * contact * SNAP_SHARE) * catch
        parts = [thud, body + lead, body, unit(snap) + .5 * body, snap]
        for part, db, lo, hi in zip(parts, levels_db, HIT_EDGES_HZ, HIT_EDGES_HZ[1:]):
            add(out, s - lead_in_s + rise_s / 2, burst(band(part, lo, hi), db))
    return out


def rubbing():
    """Threads scrape in small steps, gloves crinkle, and the tub judders as it slides."""
    # every tiny slip is a burst of grit a few milliseconds long
    slips = np.abs(signal.fftconvolve(np.abs(grains(220, 3)), fade(.014))[:N]) + .5
    threads = colour(slips * rng.standard_normal(N), THREAD_COLOUR)
    threads = threads * strokes(TWISTS, attack_s=0.0017, release_s=0.01)
    scrape = colour(slips * grains(1800, 2.4) * amp(6.1 * walk(130)), SCRAPE_COLOUR)
    scrape = scrape * strokes(SCRAPES, attack_s=0.0053, release_s=0.014)
    creases = grains(4000, 3.5) * amp(5 * walk(130))
    rustle = colour(creases, RUSTLE_COLOUR) * strokes(CRINKLES, attack_s=0.0074, release_s=0.024)
    slide = unit(band(grains(633, 3.6), 660, 950)) + 0.5 * unit(band(grains(820, 2.7), 340, 1550))
    return threads + scrape + rustle + slide * strokes(SHOVES, attack_s=0.0037, release_s=0.018)


def bumps():
    """The cabinet floor gives a few dull, ragged cycles."""
    out = np.zeros(N)
    swell = HIT_S / 0.0041 * np.exp(1 - HIT_S / 0.0062)
    for s, hz, db in BUMPS:
        rattle = unit(band(rng.standard_normal(len(HIT_S)), hz / 2, hz * 2))
        add(out, s, amp(db) * swell * (np.sin(2 * np.pi * hz * HIT_S) + rattle) / 2)
    return out


def swishes():
    """Cloth slides by in bands of hiss that swell and catch unevenly."""
    out = 0
    for start, end, hz, db in SWISHES:
        cloth = colour(grains(2500, 2.8), [(hz / 4, -9), (hz, 0), (hz * 1.5, -7), (hz * 4, -12)])
        out = out + cloth * strokes([(start, end, db)], attack_s=0.024, release_s=0.0061)
    return out * amp(2.2 * walk(60) + 2.2 * walk(300))


def room():
    """Faint broad noise, and a narrow hush that later sits lower in pitch."""
    out = colour(rng.standard_normal(N), ROOM_COLOUR) * amp(ROOM_DB + walk(32))
    for start, end, lo, hi, db in HUSH:
        hush = unit(band(rng.standard_normal(N), lo, hi))
        out = out + hush * strokes([(start, end, db)], attack_s=0.094, release_s=0.02)
    return out


def cabinet(x, t60_s, wet_db):
    """Add dense decaying reflections, as of a small cupboard or ringing steel."""
    t = T_S[:SR // 2]
    tail = rng.standard_normal(len(t)) * np.exp(-np.log(1000) * t / t60_s) * (t > .003)
    return x + amp(wet_db) * signal.fftconvolve(x, tail / np.linalg.norm(tail))[:N]


def ring(modes):
    """Response of (freq_hz, width_hz, gain_db) modes, struck at a slightly different spot each time."""
    out = 0
    for hz, width, db in modes:
        detune, size = rng.standard_normal(2)
        decay = width * np.exp(-np.pi * width * HIT_S)
        tone = np.sin(2 * np.pi * hz * (1 + DETUNE * detune) * HIT_S)
        out = out + amp(db + SPOT_SPREAD_DB * size) * decay * tone
    return out


def grains(rate_hz, spread_db):
    """Random tiny impacts of very unequal size; rms 1."""
    sizes = amp(spread_db * np.minimum(rng.exponential(size=N), 4))
    return unit((rng.random(N) < rate_hz / SR) * rng.choice([-1, 1], N) * sizes)


def walk(rate_hz):
    """Smooth random wander; rms near 1."""
    k = max(int(SR / rate_hz), 2)
    steps = np.repeat(rng.standard_normal(N // k + 1), k)
    return unit(uniform_filter1d(steps, k)[:N])


def strokes(rows, attack_s, release_s):
    """Gain of (start_s, end_s, level_db) movements: each rises, holds and dies away."""
    gain = 0
    for start, end, db in rows:
        attack = np.clip((T_S - start) / attack_s, 0, 1)
        gain = gain + amp(db) * attack * np.exp(-np.clip((T_S - end) / release_s, 0, 30))
    return gain


def colour(x, points):
    """Shape x by (freq_hz, gain_db) points, falling away beyond both ends; rms 1."""
    hz, db = np.transpose(points)
    f = np.arange(N // 2 + 1) * SR / N + 1
    gain = amp(np.interp(np.log(f), np.log(hz), db))
    gain = gain * np.minimum(f / hz[0], 1) * np.minimum(hz[-1] / f, 1) ** 2
    return unit(irfft(rfft(x) * gain, N))


def band(x, lo_hz, hi_hz):
    """Causal band-pass."""
    return signal.sosfilt(signal.butter(3, [lo_hz, hi_hz], "band", fs=SR, output="sos"), x)


def fade(t60_s):
    """Exponential decay over the length of a hit."""
    return np.exp(-np.log(1000) * HIT_S / t60_s)


def burst(x, db):
    """Scale a hit so that its energy equals 10 ms at this level."""
    return unit(x) * amp(db) * np.sqrt(SR / 100 / len(x))


def curves(table):
    """Every column after the time, joined by straight lines."""
    s, *columns = np.transpose(table)
    return [np.interp(T_S, s, c) for c in columns]


def add(out, s, sound):
    """Mix a sound in at time s."""
    i = max(int(s * SR), 0)
    out[i:i + len(sound)] += sound[:N - i]


def amp(db):
    """Decibels to gain."""
    return 10 ** (np.asarray(db) / 20)


def unit(x):
    """Scale to rms 1."""
    return x / np.sqrt(np.mean(x ** 2) + 1e-24)


def scene():
    """Water, handling and machine in the cupboard, over quiet room noise."""
    pipe = hits(pipe_clicks(), PIPE_MODES, contact=0.98, crack_db=-4, ring_db=3.5,
                thud_hz=371, thud_t60_s=0.054)
    tub = hits(tub_knocks(), TUB_MODES, contact=0.82, crack_db=-1.5, ring_db=2.5,
               thud_hz=356, thud_t60_s=0.039)
    handling = cabinet(pipe + tub + rubbing() + swishes(), t60_s=0.058, wet_db=-13.5)
    poured = (gush() + splashes()) * pouring()
    water = cabinet(poured + spray() + bend() + pop(), t60_s=0.012, wet_db=-9.5)
    return (water + handling + bumps() + machine() + room())[None]


def record(dry):
    """A steep elliptic low-pass cuts the top."""
    return signal.sosfilt(signal.ellip(10, .2, 70, TOP_HZ, fs=SR, output="sos"), dry)


dry = scene()
out = record(dry)
store_pcm(out)
```